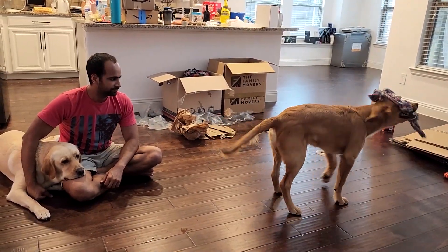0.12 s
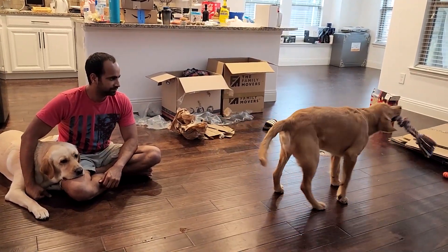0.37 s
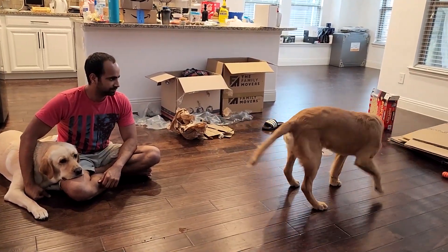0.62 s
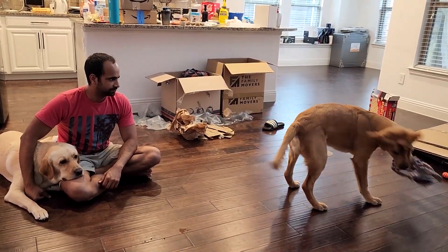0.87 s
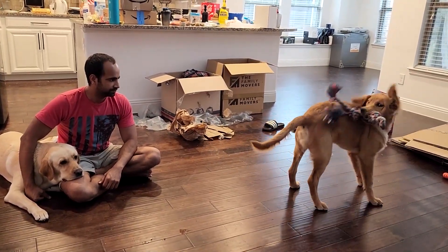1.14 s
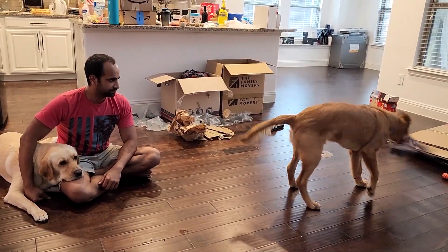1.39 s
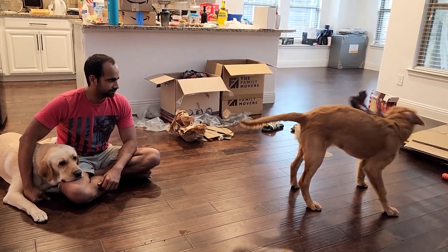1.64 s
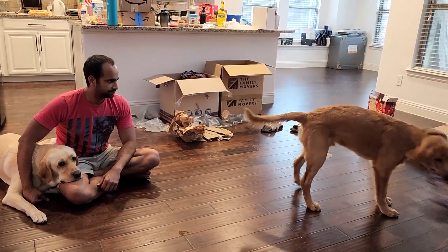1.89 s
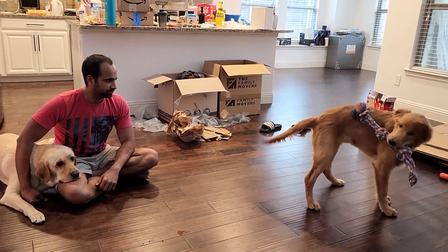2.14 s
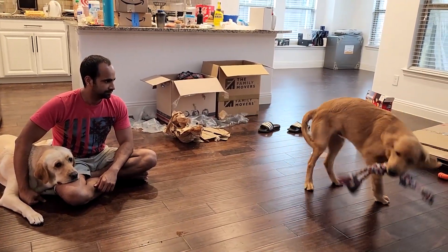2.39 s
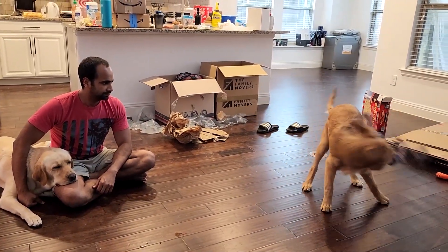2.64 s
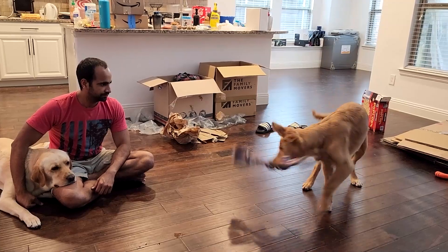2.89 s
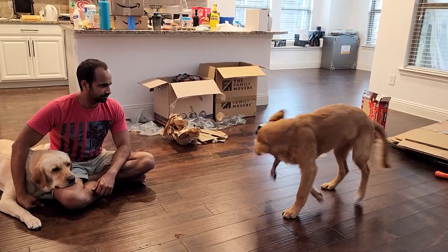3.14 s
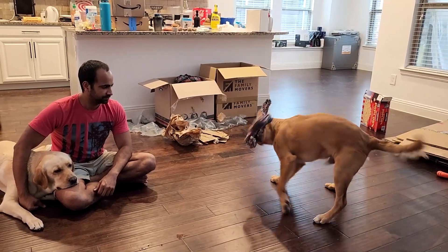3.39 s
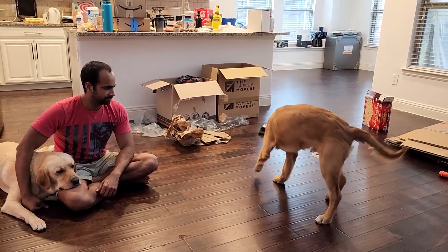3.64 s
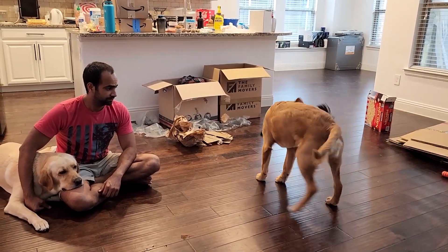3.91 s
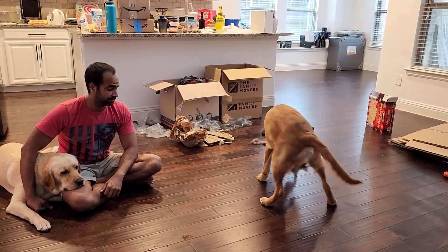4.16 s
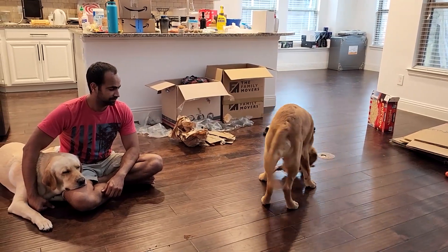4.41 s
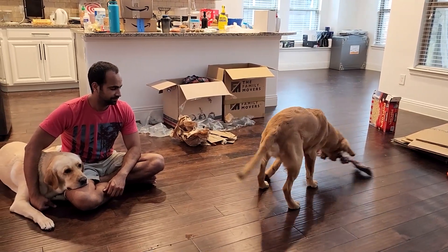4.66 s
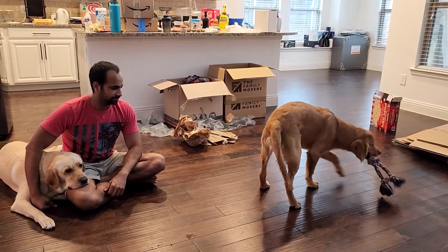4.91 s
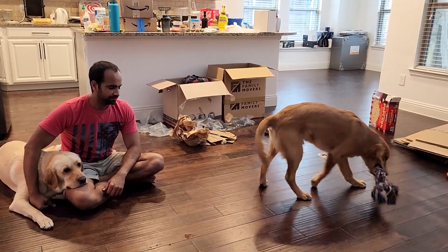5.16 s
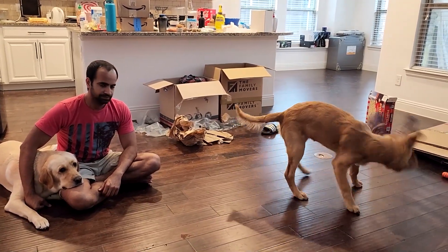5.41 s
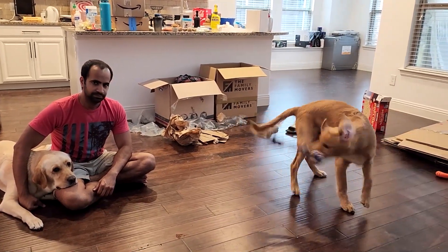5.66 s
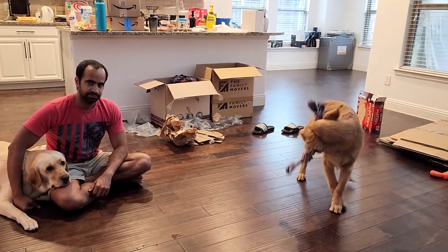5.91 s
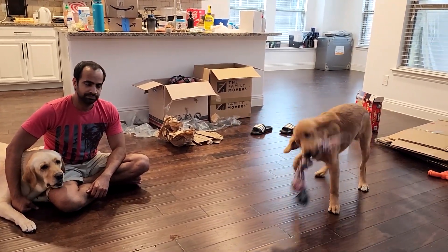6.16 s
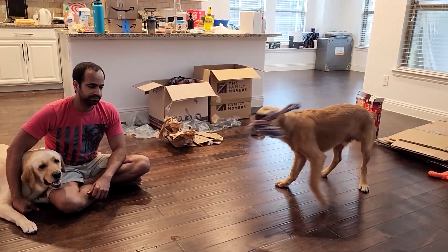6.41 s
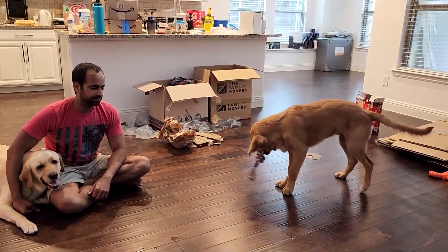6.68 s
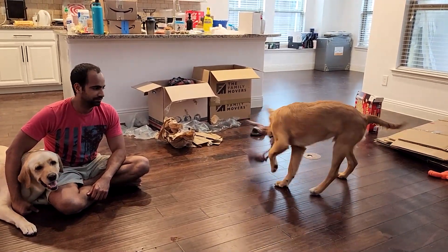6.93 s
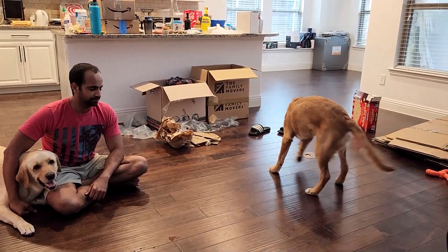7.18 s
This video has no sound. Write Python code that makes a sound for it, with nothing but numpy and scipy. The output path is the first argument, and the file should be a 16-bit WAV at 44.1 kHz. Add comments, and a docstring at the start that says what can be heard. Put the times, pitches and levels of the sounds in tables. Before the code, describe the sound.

A young dog plays with a rope toy on a wooden floor in a large, bare, reverberant room. Its growls are short, rough and throaty, pitched around 200 to 250 Hz, muffled by rope and edged with breath. After a weak tail at the very start, growls come at about 0.5, 1.05 and 1.55 seconds, with a faint huff near 2.05. Fuller ones follow at 2.45 and 3.0 to 3.3, then 3.6, a clipped one at 4.1, and softer ones at 4.7 and 5.2. A quick stuttering cluster runs 5.5 to 5.8. A tiny huff and thin claw squeak come near 6.15, then growls at 6.4 to 6.7 and 7.0 to 7.2. Claws tick near 2.7, 3.45 and faintly later; a paw thuds at 3.3. Rope and fur rustle lightly, with brief bright hisses. Low hum and faint hiss continue beneath, in stereo.

```python
"""Short, rough growls follow one another throughout: a young dog works a rope toy, turning on boards in a
large bare room. Its vocal folds beat unevenly into chest, throat and mouth; breath hisses past rope and teeth.
Among them claws tick and squeak, a paw thuds, rope and coat rustle, brief bright hisses sound, mostly near
growl onsets, and the house hums and hisses faintly. Two microphone ports a hand apart hear it,
the right one a little earlier; the room's tail reaches both."""
import sys
import numpy as np
from scipy import signal
from scipy.fft import rfft, irfft, next_fast_len
from scipy.io import wavfile
from scipy.ndimage import map_coordinates

SR = 44100
rng = np.random.default_rng(int(sys.argv[2]) if len(sys.argv) > 2 else 0)


def invert_db(level):
    """Linear amplitude ratio for a level in decibels (20 dB per decade), elementwise."""
    return 10 ** (np.asarray(level, dtype=float) / 20)


def materialize(psi):
    """Save the field psi as 16-bit PCM at rate SR to the path in sys.argv[1].

    A 1-D psi becomes a single channel; in a 2-D psi each row is a channel.
    """
    bounded = np.clip(np.atleast_2d(psi).T, -1, 1)
    quanta = np.round(bounded * 32767).astype(np.int16)
    wavfile.write(sys.argv[1], SR, quanta)


N = 321930  # samples

# Pushes of the folds, levels ahead of the lifts in dog():
# start_s, length_s, chest_db, half-rate rumble_db re chest, throat_db re chest
GROWLS = [(-.05, 0.048, -29, -9, -1), (.03, .2, -50, -5, 0), (0.508, 0.092, -22, 1, -8),
          (0.584, .15, -18, -10, -7), (1.045, 0.14, -12, -6, -8.5), (1.178, .1, -18, -10, -8),
          (1.516, 0.045, -30, 3, -21), (1.558, 0.086, -10.5, -20, -10.5), (2.045, 0.084, -59, 24, 6),
          (2.431, .06, -16.5, -2, -4), (2.473, 0.23, -10, -14, -11), (3.0, .13, -8.5, -18, -18),
          (3.133, .21, -17, -6, -16), (3.553, .04, -8.5, -15, -25.5), (3.618, 0.15, -12, -10, -9.5),
          (4.118, 0.046, -9, -13.5, -20.5), (4.681, .08, -34, 10, -19), (4.771, .11, -19.5, 2, -16.5),
          (5.167, 0.059, -19, -0.5, -13), (5.49, 0.062, -33, -6, -26), (5.557, .08, -20, -3, -14),
          (5.64, .07, -15, -19.5, -20), (5.72, .08, -13, -9, -14.5), (6.4, .045, -27.5, 8.5, 7.5),
          (6.442, 0.11, -16, 2, -12), (6.58, 0.13, -14.5, -7.5, -20), (6.985, .04, -17, -1.5, -36),
          (7.025, .07, -9, -14, -20.5), (7.103, 0.087, -12.5, -28, -24)]
# Air leaving around the rope, levels ahead of the lifts in dog():
# start_s, length_s, mouth_db, palate_db re mouth, teeth_db re mouth
PUFFS = [(-.05, 0.031, -36, -1.5, -10), (0.489, 0.039, -24.5, -8, -17), (.515, 0.16, -25.5, -5.5, -12.5),
         (1.019, .25, -33, 6, -8), (1.359, .1, -46, -2.5, -15), (1.511, 0.053, -35.5, -6, -36),
         (1.568, 0.085, -35, 6, -12), (2.034, 0.1, -38, -2, -11), (2.405, 0.13, -24, -4, -12),
         (2.591, 0.09, -38, 4.5, -8.5), (2.969, 0.18, -26.5, -7.5, -27), (3.236, 0.11, -46.5, -2, 0.5),
         (3.552, 0.12, -44.5, 9, -21), (3.658, 0.11, -41.5, 12.5, -15), (4.113, 0.088, -33.5, -12.5, -39),
         (4.646, 0.14, -30, -37, -46), (4.773, 0.12, -30, -19, -22), (5.163, 0.081, -21, -6.5, -19),
         (5.555, 0.18, -65.5, 19, -1), (5.677, 0.073, -29, -10.5, -23), (5.729, 0.059, -29.5, 3.5, -14.5),
         (6.101, 0.021, -25.5, -1.5, -36), (6.112, 0.049, -41.5, 1.5, -23), (6.381, 0.11, -26, 2.5, -10),
         (6.611, .12, -31.5, -13, -21.5), (6.985, 0.035, -32, 2.5, -9), (7.052, 0.22, -46.5, -12.5, -2.5)]
# Course of the voice: time_s, fold_rate_hz, mouth_hz, palate_hz
TRACT = [(0.52, 247.2, 1183, 1890), (0.72, 225.9, 1110, 1970), (1.07, 199.2, 1060, 2165),
         (1.53, 198.3, 1140, 1660), (1.63, 247.9, 1217, 1800), (2.45, 219.6, 1094, 2013),
         (3.0, 199.4, 1042, 1600), (3.57, 212.0, 1240, 2040), (3.72, 235.0, 1150, 1710),
         (4.15, 207.8, 1156, 1745), (4.68, 189.0, 1135, 1770), (5.16, 236.3, 1266, 1767),
         (5.27, 224.5, 1066, 2094), (5.62, 210.1, 1063, 1550), (5.78, 228.2, 972, 2150),
         (6.11, 206.0, 1212, 1926), (6.45, 197.4, 1230, 1924), (7.02, 232.1, 1142, 1674),
         (7.16, 216.5, 968, 1780)]
# Fixed resonances, each passed twice: centre_hz, width_hz (one pass), gain_db (one pass)
CHEST = [(165, 50, -3), (225, 80, 0)]
THROAT = [(497.5, 163, 3.32), (704, 117, 6.42), (902, 281, 1.16)]
PALATE = [(1683, 227, -0.83), (2231, 147, 0.33)]
TEETH = [(2870, 310, 6), (4080, 760, 7), (5290, 1220, 6.5), (7500, 2040, 1)]
# Centres between which the moving resonances blend: centre_hz
MOUTH_BANK = [950, 1100, 1270, 1470]
PALATE_BANK = [1600, 1800, 2030, 2300]
# How each part follows a push, puff or hiss:
# lag_s, onset_db_per_s, onset_below_full_db, swell_s, sag_db_per_s, release_db_per_s
CHEST_SHAPE = (.001, 800, 6, .025, 15, 500)
RUMBLE_SHAPE = (.001, 800, 4, .02, 35, 400)
THROAT_SHAPE = (0.013, 800, 7.9, 0.038, 34.4, 223)
MOUTH_SHAPE = (.001, 1700, 6.4, 0.033, 57, 570)
PALATE_SHAPE = (.012, 1700, 6.8, 0.034, 38, 380)
TEETH_SHAPE = (0.012, 580, 14.5, 0.054, 55, 260)
HISS_SHAPE = (.001, 900, 4.3, 0.021, 100, 380)
# A claw sliding on varnish: time_s, pitch_hz, level_db (peak, about which it wavers)
SQUEAK = [(6.14, 5350, -59), (6.18, 5420, -50.5), (6.27, 5040, -62)]
# Claws on the boards: start_s, level_db (relative), ring_hz, left_minus_right_db
CLAWS = [(2.6783, -34, 11340, -15), (2.681, -27.5, 11600, -1.5), (3.435, -22.5, 10700, -4.5),
         (3.445, -29, 7000, 0), (3.4645, -34, 13000, -6), (5.082, -50, 8400, -12),
         (5.502, -41.5, 6800, -20), (6.1125, -43, 7330, 0), (6.306, -36, 5160, 2.5)]
# A paw landing hard: start_s, level_db (relative), board_hz
PAW = [(3.283, -13.5, 177)]
# Stirring of rope and coat: time_s, level_db
STIR = [(0, -59.5), (3.4, -57.5), (4.0, -81), (5.8, -59), (6.45, -60.5), (6.7, -89)]
# Brief bright hisses, mostly near growl onsets: start_s, length_s, level_db
BRIGHT_HISSES = [(0.493, 0.025, -42.5), (1.104, 0.032, -45.5), (2.08, 0.047, -48), (2.444, .06, -45.5),
                 (2.692, 0.038, -45), (3.432, .04, -42.5), (5.173, 0.1, -59), (6.11, .03, -45),
                 (6.286, 0.027, -51.5), (7.128, 0.043, -47.5)]
# Colour of rustle and bright hisses: pitch_hz, level_db (relative)
RUSTLE_COLOUR = [(5000, -26), (6300, -6.5), (8000, -3.5), (11500, -7), (15500, -10)]
# Decay of the room: pitch_hz, t60_s
ROOM_DECAY = [(100, 0.22), (400, 0.44), (1200, 0.64), (3000, 0.53), (10000, 0.3)]
# Left-right likeness of diffuse sound at the ports: pitch_hz, correlation (no unit)
ALIKE = [(100, 0.99), (400, 0.93), (900, 0.1), (2000, 0.054), (6000, 0.048)]
# Colour of the house: pitch_hz, level_db (relative)
HOUSE_COLOUR = [(25, -84), (50, -56.5), (65, -64.5), (120, -55.5), (200, -65), (310, -78), (1000, -85),
                (2500, -87.5), (4500, -99), (5900, -91.5), (6300, -83), (7500, -83.5), (9500, -91.5),
                (10000, -110), (15500, -115)]
# The recorder's body shades the ports: pitch_hz, left_minus_right_db
SHADE = [(600, .5), (1200, 6), (2500, -5.5), (8000, -14), (13000, 20.5)]


def dog():
    """Fold pulses and gated breath pass chest, throat, and a mouth and palate that shift around the rope."""
    chest_db, rumble_db, throat_db, mouth_db, palate_db, teeth_db = effort()
    rate_hz, mouth_hz, palate_hz = curves(TRACT)
    # folds that double their period also lose their beat
    rough = np.clip((rumble_db + 24) / 16, 0.35, 1)
    pulses, phase = folds(rate_hz, jitter=0.11 * rough, scatter_db=3.5, alternate_db=5)
    throb = invert_db(6 * np.tanh(0.8 * wobble(65)))  # loose tissue flaps over the folds

    # the chest passes the fold rate nearly as a tone
    tone = np.sin(2 * np.pi * phase) + 0.07 * np.sin(4 * np.pi * phase)
    chest_ring = unit(filtered(pulses * throb, twice(CHEST)))
    chest = unit(throb * tone + 0.8 * rough * chest_ring)
    rumble = unit(invert_db(3.8 * wobble(50)) * np.sin(np.pi * phase + 1.7 * wobble(28)))

    # breath opens once in two fold cycles; rows feed throat, mouth and palate
    breath = rng.standard_normal((3, N)) * (0.68 + np.cos(np.pi * phase / 2) ** 4)
    flutter = invert_db(3.68 * np.array([wobble(60), wobble(60), wobble(60)]))
    pulse_share = [[0.88], [0.75], [0.65]]
    breath_share = [[0.5], [0.65], [0.75]]
    rasp = flutter * (unit(pulses) * pulse_share + unit(breath) * breath_share)

    throat = unit(filtered(rasp[0], twice(THROAT)))
    mouth = moving(rasp[1], mouth_hz, MOUTH_BANK, sharp=0.18)
    roof = moving(rasp[2], palate_hz, PALATE_BANK, sharp=0.14)
    roof = unit(roof + 0.7 * unit(filtered(rasp[2], twice(PALATE))))
    upper = invert_db(throat_db) * throat + invert_db(mouth_db) * mouth + invert_db(palate_db) * roof
    air = unit(filtered(rng.standard_normal(N) * invert_db(2.2 * wobble(90)), twice(TEETH)))

    voice = invert_db(chest_db + 1.5) * (chest + invert_db(rumble_db) * rumble)
    voice = voice + invert_db(3.5) * upper + invert_db(teeth_db + 1.5) * air
    # a small body radiates no deep bass
    return filtered(voice, lambda hz: 1 / (1 - 1j * 60 / (hz + 1)) ** 3)


def effort():
    """Pushes and puffs become levels in dB of chest, rumble (re chest), throat, mouth, palate and teeth."""
    s, length, chest, rumble, throat = np.transpose(GROWLS)
    chest_db = bursts(s, length, chest, CHEST_SHAPE)
    rumble_db = bursts(s, length, chest + rumble, RUMBLE_SHAPE) - chest_db
    throat_db = bursts(s, length, chest + throat, THROAT_SHAPE)
    s, length, mouth, palate, teeth = np.transpose(PUFFS)
    mouth_db = bursts(s, length, mouth, MOUTH_SHAPE)
    palate_db = bursts(s, length, mouth + palate, PALATE_SHAPE)
    puff_db = bursts(s, length, mouth + teeth, TEETH_SHAPE)
    # faint air past the teeth goes on between puffs
    teeth_db = 10 * np.log10(invert_db(puff_db) ** 2 + invert_db(-64.5) ** 2)
    return chest_db, rumble_db, throat_db, mouth_db, palate_db, teeth_db


def folds(rate_hz, jitter, scatter_db, alternate_db):
    """Fold closures, uneven in time and size, every second one weaker; also the phase in cycles."""
    phase = np.cumsum(rate_hz * (1 + jitter * wobble(70))) / SR
    closures = np.flatnonzero(np.diff(np.floor(phase)))
    size_db = scatter_db * rng.standard_normal(N)[closures]
    size_db = size_db - alternate_db * (np.arange(len(closures)) % 2)
    pulses = np.zeros(N)
    pulses[closures] = invert_db(size_db)
    return pulses, phase


def moving(x, centre_hz, bank_hz, sharp):
    """A cavity resonance that follows centre_hz, blended from fixed ones; sharp is width over centre."""
    near = [np.exp(-(np.log(centre_hz / hz) / 0.089) ** 2) for hz in bank_hz]
    rings = [filtered(x, twice([(hz, sharp * hz, 0)])) for hz in bank_hz]
    return unit(sum(k * ring for k, ring in zip(near, rings)) / sum(near))


def squeak():
    """Fast stick and slip of a claw on varnish: a thin, unsteady whistle."""
    hz, level_db = curves(SQUEAK)
    t = np.arange(N) / SR
    sliding = (t > SQUEAK[0][0]) & (t < SQUEAK[-1][0])
    phase = np.cumsum(hz * (1 + 0.019 * wobble(250))) / SR
    return sliding * invert_db(level_db + 6.6 * wobble(78)) * np.sin(2 * np.pi * phase)


def feet():
    """Claws ring the boards briefly and a paw makes them thud; left and right."""
    out, t = np.zeros((2, N + SR)), np.arange(SR // 10) / SR
    for s, db, hz, pan_db in CLAWS:
        strike = np.sin(2 * np.pi * hz * t) + 1.9 * rng.standard_normal(len(t))
        tick = filtered(invert_db(-60 * t / 0.0072) * strike, modes([(hz, 0.86 * hz, 0)]))
        side_db = np.array([[0.5], [-0.5]]) * pan_db
        out[:, round(s * SR):][:, :len(t)] += invert_db(db + 0.5 + side_db) * tick
    for s, db, hz in PAW:
        swell = 1 - np.exp(-t / 0.003)
        thud = invert_db(-60 * t / 0.072) * swell * np.sin(2 * np.pi * hz * t)
        out[:, round(s * SR):][:, :len(t)] += invert_db(db + 11.5) * thud
    return out[:, :N]


def rustle():
    """Rope fibres and fur brush in fine, clumped grains, with brief bright hisses; left and right."""
    stir_db, = curves(STIR)
    grains = rng.standard_normal((2, N)) * invert_db(1.5 * wobble(25) + 2.5 * wobble(400))
    hiss_db = bursts(*np.transpose(BRIGHT_HISSES), HISS_SHAPE)
    level = np.hypot(invert_db(stir_db), invert_db(hiss_db))
    return level * unit(filtered(grains, lambda hz: invert_db(along(RUSTLE_COLOUR, hz))))


def room(x, hop=SR // 4):
    """Each frequency dies at its own speed; the dog moves, so the tail changes every quarter second."""
    out = np.zeros((2, N + 2 * SR))
    padded = np.pad(x, (hop, 2 * hop))
    for start in range(-hop, N, hop):
        hz, t, z = signal.stft(rng.standard_normal((2, SR * 3 // 4)), SR, nperseg=256)
        decay = invert_db(-60 * t / along(ROOM_DECAY, hz)[:, None])
        tail = signal.istft(z * decay, SR, nperseg=256)[1]
        piece = padded[start + hop:start + 3 * hop] * signal.windows.hann(2 * hop, sym=False)
        wet = signal.fftconvolve(piece[None], tail / np.linalg.norm(tail[0]), axes=1)
        out[:, start + hop:][:, :wet.shape[1]] += wet
    return diffuse(out[:, hop - 300:hop - 300 + N])  # the tail lags by 300 samples


def house():
    """Hum and hiss of the building: coloured diffuse noise, slightly unsteady."""
    noise = filtered(rng.standard_normal((2, N)), lambda hz: invert_db(along(HOUSE_COLOUR, hz)))
    return invert_db(-38 + 1.5 * wobble(2.2)) * unit(diffuse(noise))


def diffuse(pair):
    """Two unrelated signals mixed to the likeness of diffuse sound at the ports."""
    def turn(hz):
        return np.arccos(np.clip(along(ALIKE, hz), -1, 1)) / 2
    mid, side = filtered(pair, lambda hz: np.array([np.cos(turn(hz)), np.sin(turn(hz))]))
    return np.array([mid + side, mid - side])


def bursts(onset_s, length_s, level_db, shape):
    """Level in dB of overlapping bursts: quick onset, swell, slow sag, release."""
    lag_s, onset_rate, step_db, swell_s, sag, release = shape
    t = np.arange(0, N, 32) / SR
    age, length_s = t - onset_s[:, None] - lag_s, length_s[:, None]
    down_db = onset_rate * np.maximum(-age, 0)
    down_db = down_db + step_db * np.clip(1 - age / swell_s, 0, 1)
    down_db = down_db + sag * np.clip(age, 0, length_s)
    down_db = down_db + release * np.maximum(age - length_s, 0)
    power = np.sum(invert_db(level_db[:, None] - down_db) ** 2, 0) + 1e-10
    return np.interp(np.arange(N) / SR, t, 10 * np.log10(power))


def curves(rows):
    """One value per sample for each column after the time."""
    s, *cols = np.transpose(rows)
    return [np.interp(np.arange(N) / SR, s, c) for c in cols]


def wobble(rate):
    """A smooth random curve, rate knots a second."""
    knots = rng.standard_normal(int(N * rate / SR) + 4)
    return map_coordinates(knots, [np.arange(N) * rate / SR])


def modes(table):
    """Causal response of resonances (centre_hz, width_hz, gain_db), alternating in sign."""
    def response(f):
        return sum((-1) ** k * invert_db(db) * 1j * f * w / (c * c - f * f + 1j * f * w)
                   for k, (c, w, db) in enumerate(table))
    return response


def twice(table):
    """Resonances passed two times over: deep valleys between them."""
    return lambda f: modes(table)(f) ** 2


def filtered(x, response):
    """x times a complex response of frequency."""
    m = next_fast_len(x.shape[-1] + 8192)
    spectrum = rfft(x, m) * response(np.fft.rfftfreq(m, 1 / SR))
    return irfft(spectrum, m)[..., :x.shape[-1]]


def along(points, hz):
    """Values read between (pitch_hz, value) points on a log axis."""
    f, v = np.transpose(points)
    return np.interp(np.log(hz + 1), np.log(f + 1), v)


def unit(x):
    """Scaled to rms 1."""
    return x / np.sqrt(np.mean(x ** 2) + 1e-20)


def scene():
    """Direct sound reaches the right port first; the room answers, over rustle and house."""
    voice, steps = dog() + squeak(), feet()
    side = np.array([[1], [-1]]) / 2
    lag_s = 0.00015  # left port behind right

    def path(hz):
        return invert_db(side * along(SHADE, hz)) * np.exp(-2j * np.pi * hz * lag_s * side)
    ports = filtered(voice, path)
    answer = room(invert_db(-2.0) * voice + steps.mean(0))
    return ports + steps + answer + rustle() + house()


def low_pass(x):
    """Removes everything above the highest recorded frequency."""
    return signal.sosfilt(signal.butter(12, 16360, fs=SR, output="sos"), x)


def record(dry):
    """The recorder bends peaks under a soft ceiling and cuts off the highest treble."""
    held = dry / (1 + np.abs(dry / 0.92) ** 8) ** (1 / 8)
    mix = filtered(held, lambda hz: hz < 15830)
    return low_pass(mix)


dry = scene()
out = record(dry)
materialize(out)
```